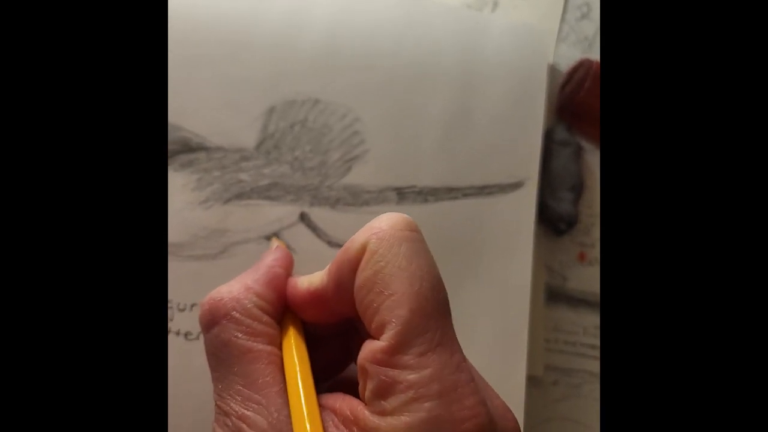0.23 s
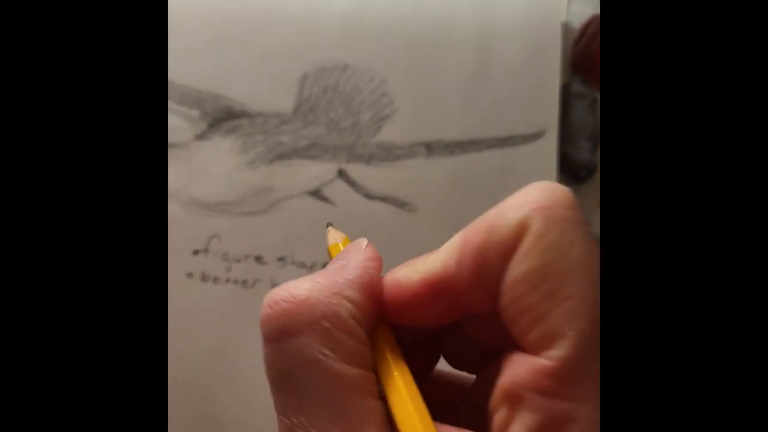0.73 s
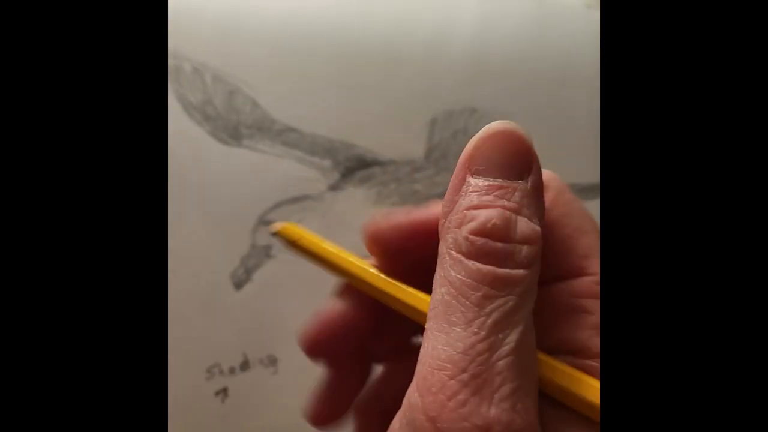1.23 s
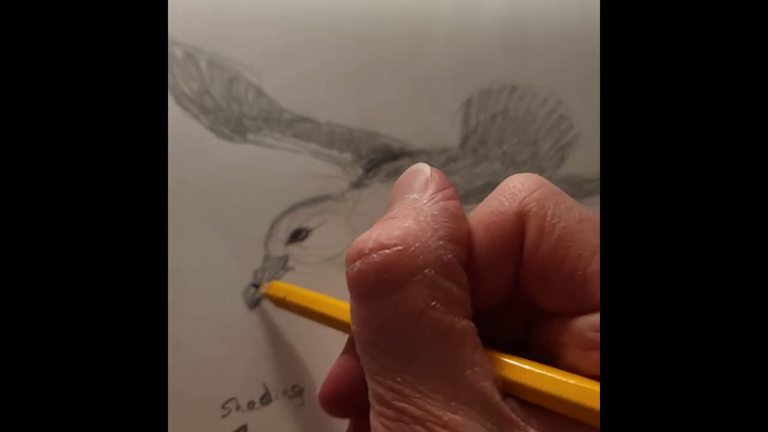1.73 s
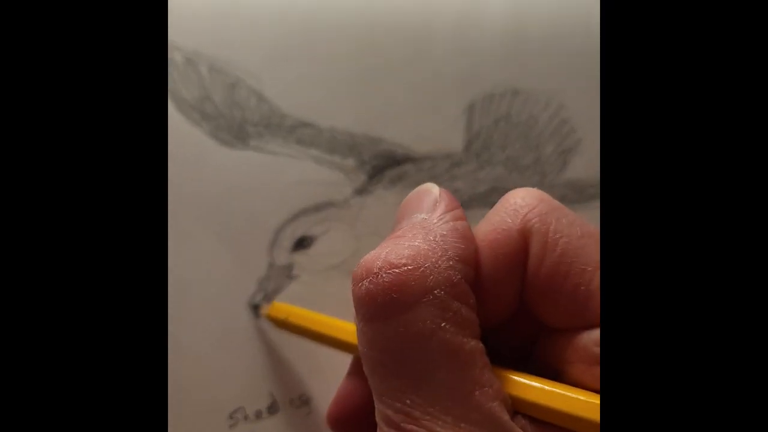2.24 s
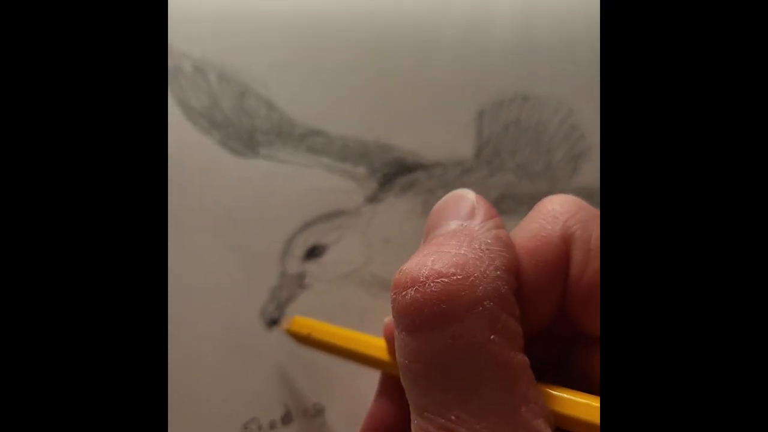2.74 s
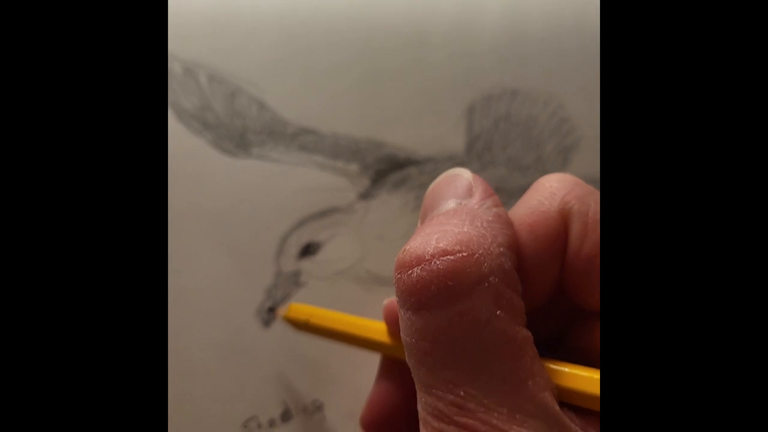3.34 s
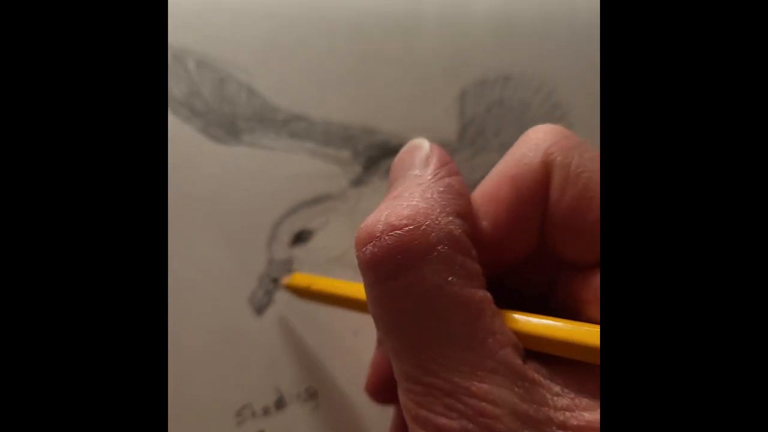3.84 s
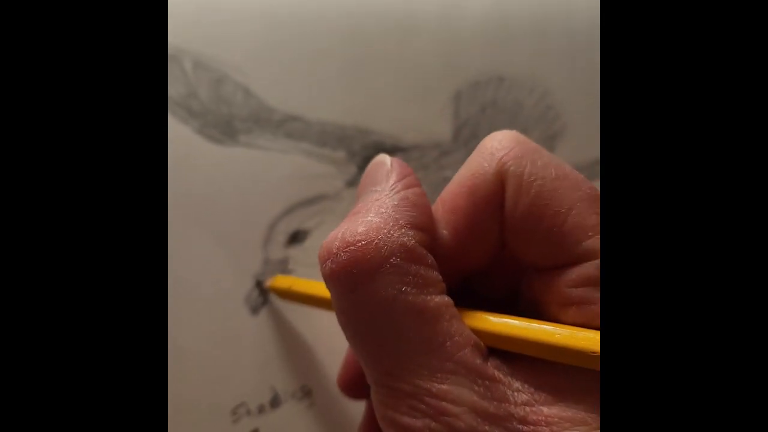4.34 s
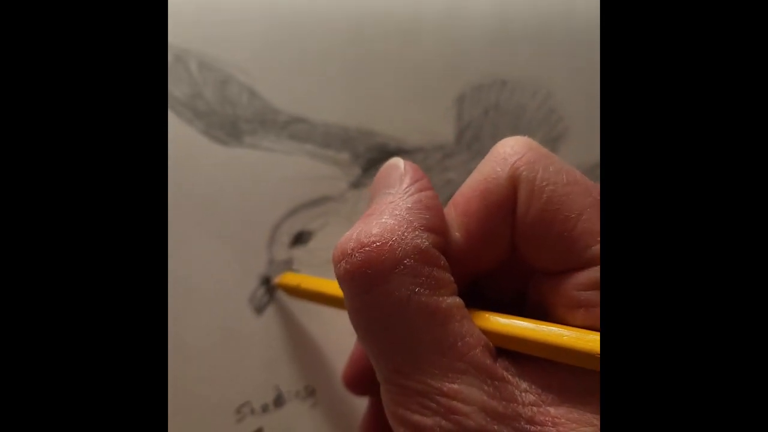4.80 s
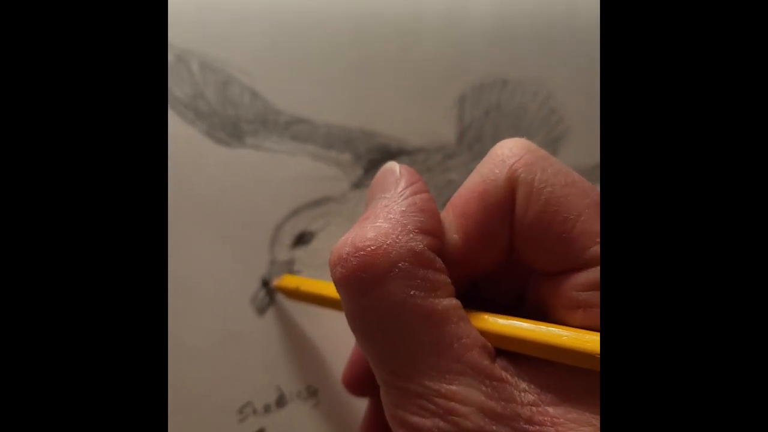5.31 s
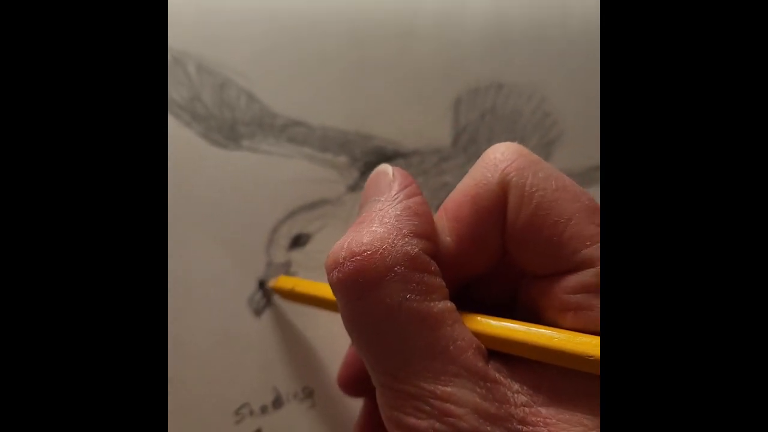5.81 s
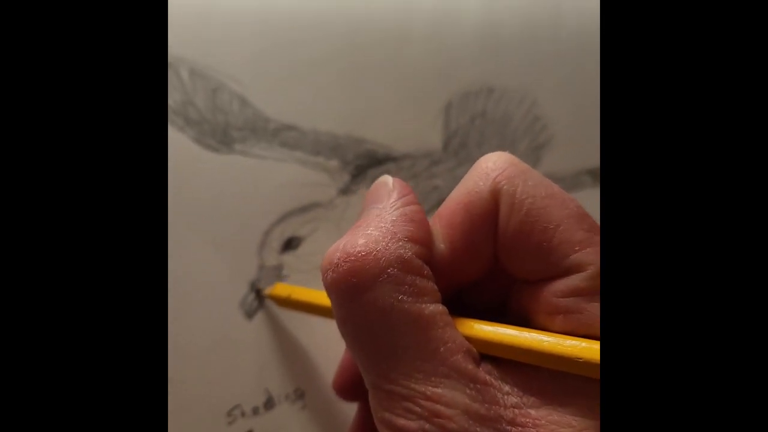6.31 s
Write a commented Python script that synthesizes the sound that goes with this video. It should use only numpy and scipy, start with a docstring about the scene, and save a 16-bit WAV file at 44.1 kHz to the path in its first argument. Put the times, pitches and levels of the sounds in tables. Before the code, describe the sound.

A quiet room heard through a close stereo microphone: steady low mains hum around 120 Hz, wavering motor tones, soft dark air noise and a faint thin whine near 860 Hz, clearer until about 1.4 s and again from 4.9 to 6 s. From 0 to 0.6 s, short bright pencil strokes fizz on paper, ending with a dry tick. From 0.6 to 1.6 s the hand slides over the page, papery and towards the right, with a dull forearm rub; a soft damped knock falls at 1.3 s. Lighter brushes continue to about 2.2 s, with another tick. Then it is mostly hum, a deep drone climbing slightly and swelling, and a brief slide at 3.6 s. From 4.1 s small ticks and faint, quick to-and-fro shading return, with firmer, less fizzy scratches near 4.6 s, 5.4 s and, densest, 6 to 6.5 s.

```python
"""A graphite pencil shades a sketchbook page in short, light strokes, close to two microphone ports.
First come quick, fizzy strokes; then the hand slides over the page, the forearm rubs and the pad knocks softly.
After a quieter gap with one more slide, faint shading and firmer strokes return; the point ticks now and then.
Strokes and skin are random slips over paper fibres, shaped by speed curves; ticks and the knock are short decays.
Throughout, sines make mains hum, motor tones, a whine and a drone that climbs once; noise makes the room's air."""
import sys
import numpy as np
from scipy.fft import rfft, irfft, next_fast_len
from scipy.io import wavfile
from scipy.ndimage import map_coordinates

SR = 44100
rng = np.random.default_rng(int(sys.argv[2]) if len(sys.argv) > 2 else 0)


def log_audio(samples):
    """Write samples as a 16-bit WAV file to the path given in sys.argv[1]."""
    # one column per channel
    frames = np.atleast_2d(samples).T
    # limit to full scale, then quantise
    limited = np.clip(frames, -1, 1)
    pcm = np.round(limited * 32767).astype(np.int16)
    wavfile.write(sys.argv[1], SR, pcm)


N = 289296

# how alike left and right are for sounds on the page: f/Hz, likeness (1 = the same)
PAGE_LIKENESS = [(1500, 0.11), (4000, 0.23), (7000, .4), (11000, 0.97)]


def pencil():
    """Each stroke speeds up and slows down and rings the shaft; the lead's sharp edge adds a high fizz."""
    # pencil strokes: middle t/s, length/s, level/dB
    strokes = [(0.021, 0.049, -68), (.102, .046, -78), (.184, .042, -69.5), (.235, .045, -78),
               (.37, .06, -84), (.46, .04, -84), (.546, 0.049, -66.5), (4.34, .05, -76), (4.45, .045, -79),
               (4.533, .036, -68), (4.687, 0.055, -65), (5.33, .045, -71), (5.41, .056, -76),
               (5.88, 0.056, -76.5), (5.985, .053, -71.5), (6.195, .042, -71.5), (6.275, .08, -75),
               (6.363, .052, -66), (6.437, .042, -64), (6.52, .075, -75)]
    # colour of graphite on paper: f/Hz, relative level/dB
    graphite = [(1000, -18), (3500, -3), (4700, 3), (6500, 0), (8000, 0), (10200, -2), (11500, -3),
                (15500, -7)]
    # resonances of the shaft and lead: f/Hz, width/Hz, left gain/dB, right gain/dB
    shaft = [(4570, 350, 3.5, 9), (5630, 450, -5, -3), (6900, 300, 0, -6), (7600, 350, 7, -3.5),
             (9000, 500, -5, -7), (10200, 450, 2, 2), (15200, 500, 3, 12)]
    # colour of the sharp edge's fizz: f/Hz, relative level/dB
    edge_colour = [(1200, -18), (2400, 1), (3500, -7), (4600, -16), (6500, -4.5), (8500, -14), (9800, -2),
                   (11200, -15), (13400, 1), (15500, -12)]
    # how alike left and right are in the fizz: f/Hz, likeness (1 = the same)
    edge_likeness = [(3000, .1), (12000, 0.66), (15000, .7)]
    # the pencil starts upright on its sharp edge, then is laid flatter; fizz levels are relative to the stroke
    regrip_s, upright_fizz_db, flat_fizz_db = 1.2, 5, -11

    speed = sum(amp(db) * sweep(middle, length) for middle, length, db in strokes)
    speed = speed + light_shading()
    fizz = speed * amp(np.where(seconds() < regrip_s, upright_fizz_db, flat_fizz_db))
    pressure = amp(1.4 * wobble(110))

    body = stereo(tooth(rate=22000, spread_db=1.5), graphite, PAGE_LIKENESS)
    body = filtered(body, lambda hz: bells(shaft, hz))
    body = off_the_hand(body, share=0.4, delay=0.0006, sway=0.25)

    edge = stereo(tooth(rate=26000, spread_db=3.0), edge_colour, edge_likeness)
    edge = off_the_hand(edge, share=0.38, delay=0.00038, sway=0.18)
    return pressure * (speed * body * pan(-0.3) + fizz * edge)


def light_shading():
    """The speed of the faint, loosely regular to-and-fro of the point."""
    start_s, strokes_per_s, flick_s = 4.1, 6.5, 0.048
    level_db, scatter_db = -85, 3
    beats = np.arange(start_s, N / SR, 1 / strokes_per_s)
    chance = rng.standard_normal((len(beats), 2))
    speed = np.zeros(N)
    for beat, (late, force) in zip(beats, chance):
        middle = beat + 0.2 * late / strokes_per_s
        speed += amp(level_db + scatter_db * force) * sweep(middle, flick_s)
    return speed


def ticks():
    """The point lands with a dry click that the pad damps at once, by 60 dB in 13 ms."""
    # the point touches the page: t/s, level/dB
    touches = [(0.625, -58), (.903, -66), (2.202, -61), (4.190, -65), (4.239, -67), (4.302, -60),
               (4.919, -69), (5.599, -64)]
    # colour of the click: f/Hz, relative level/dB
    click = [(1500, -15), (4000, -6), (5200, 5), (6500, -1), (8000, -4), (15500, -12)]
    blows = np.zeros(N)
    for start, db in touches:
        age = seconds() - start
        blows += (age >= 0) * amp(db - 60 * np.abs(age) / 0.013)
    return blows * stereo(rng.standard_normal((2, N)), click, PAGE_LIKENESS)


def hand():
    """Skin brushes the page on the right, the heel of the hand drags, and the forearm rubs dully on the desk."""
    # the hand slides to a new place on the page: middle t/s, length/s, level/dB
    slides = [(.76, 0.3, -72.5), (1.06, 0.12, -69), (1.31, 0.2, -71), (1.53, .08, -77), (1.837, .1, -79),
              (2.09, 0.35, -75), (3.61, .15, -76)]
    # colour of skin on paper: f/Hz, relative level/dB
    skin_colour = [(800, -21), (2300, 1.5), (3500, 3), (5600, -2.5), (6400, -2.5), (8500, -6),
                   (11200, -9.5), (11900, -13), (15500, -7.5)]
    # colour of the dragging heel: f/Hz, relative level/dB
    heel_colour = [(1200, -19), (2400, 1), (3500, 2.5), (5200, -5), (7000, -13), (12000, -23)]
    # colour of the forearm's rub: f/Hz, relative level/dB
    sleeve_colour = [(300, -15), (900, -13), (1300, 23), (1700, -18), (4000, -20), (10000, -53)]
    resting_skin_db = -85  # the resting hand never lies quite still
    # the extra drag of the heel fades out around the settling time
    heel_db, settle_s, settling_s, resting_heel_db = -77.5, 2.7, 0.14, -82
    heel_in_slide_db = -15  # each slide presses the heel too, relative to the skin
    arm_s, arm_length_s, arm_db = 0.8, 1.0, -63.5  # one shift of the forearm

    skin = stereo(tooth(rate=12000, spread_db=1.5), skin_colour, PAGE_LIKENESS)
    skin = off_the_hand(skin, share=0.22, delay=0.000885, sway=0.091)
    heel = stereo(rng.standard_normal((2, N)), heel_colour, PAGE_LIKENESS)
    sleeve = stereo(rng.standard_normal((2, N)), sleeve_colour, PAGE_LIKENESS)

    slide = sum(amp(db) * sweep(middle, length) for middle, length, db in slides)
    drag = amp(resting_heel_db) + amp(heel_db) * (1 - after(settle_s, settling_s))
    drag = drag + amp(heel_in_slide_db) * slide
    shift = amp(arm_db + 1.7 * wobble(8.6)) * sweep(arm_s, arm_length_s)

    brushing = (slide + amp(resting_skin_db)) * amp(0.93 * wobble(34.97)) * skin * pan(-5.5)
    dragging = drag * amp(wobble(12)) * heel * pan(0.69)
    rubbing = shift * sleeve * pan(3.7)
    return brushing + dragging + rubbing


def off_the_hand(x, share, delay, sway):
    """A reflection from the moving hand, about delay seconds late, cuts shifting notches, different at each port."""
    now = seconds()
    echo = []
    for side in x:
        lag = delay * np.exp(sway * wobble(3))
        echo.append(map_coordinates(side, [(now - lag) * SR]))
    return unit(x + share * np.array(echo))


def bump():
    """A fingertip drops on the pad as the grip changes: a soft, quickly damped knock."""
    start_s, level_db, pitch_hz = 1.2775, -40, 520
    ring_s = 0.018  # time to die away by 60 dB
    age = np.maximum(seconds() - start_s, 0)
    return amp(level_db - 60 * age / ring_s) * np.sin(2 * np.pi * pitch_hz * age) * pan(-1)


def appliance():
    """Steady mains hum, wavering motor tones and a narrow, airy whine that comes and goes."""
    # mains hum: multiple of the mains frequency, left level/dB, right level/dB
    hum_tones = [ (2, -38.5, -45), (4, -50.5, -51), (6, -59, -61), (8, -62.5, -68), (10, -79.5, -69)]
    # tones of the appliance motor and its casing: f/Hz, level/dB
    motor_tones = [(58.2, -68), (130.2, -53.5), (162.2, -60.5), (196.2, -62), (210.8, -67.5), (250, -57),
                   (268.9, -59), (390.2, -67.5), (395.3, -67)]
    # spells in which the whine stands out: start t/s, end t/s, level/dB added to the faint whine
    whine_spells = [(-.5, 1.4, -67), (4.9, 6, -67)]
    mains_hz, whine_hz = 60.03, 860
    faint_whine_db, whine_fade_s = -71.5, 0.11

    hum = sum(amp([[left], [right]]) * tone(multiple * mains_hz, drift=0.039, rate=4.0)
              for multiple, left, right in hum_tones)
    motor = sum(amp(db + 1.2 * wobble(1.65)) * tone(hz, drift=0.39, rate=1.5)
                for hz, db in motor_tones)

    airy = filtered(rng.standard_normal((2, N)), lambda hz: 1 / (1 + ((hz - whine_hz) / 12) ** 2))
    whine = unit(tone(whine_hz, drift=0.9, rate=9) + 0.45 * unit(airy))
    spells = sum(amp(db) * (after(start, whine_fade_s) - after(end, whine_fade_s))
                 for start, end, db in whine_spells)
    loudness = (amp(faint_whine_db) + spells) * amp(2.1 * wobble(6))
    return hum + motor * pan(1.5) + loudness * whine * pan(3.4)


def room():
    """Air noise coloured by the room, and a deep drone that swells and dips and climbs once in pitch."""
    # moving air in the room: f/Hz, relative level/dB
    air_colour = [(22, -32), (42, -13), (70, -4), (115, -1), (210, -4), (420, -8.5), (540, -17), (900, -17),
                  (1600, -23), (2500, -28), (2850, -33.5), (4200, -39), (9500, -55), (15500, -53.5)]
    # how alike left and right are in the air noise: f/Hz, likeness (1 = the same, 0 = unrelated)
    air_likeness = [(25, .85), (70, 0.99), (300, 0.92), (640, 0.3), (1400, -0.17), (3100, -0.0041),
                    (7000, -0.026), (11000, 1), (15000, 0.87)]
    # room resonances: f/Hz, width/Hz, left gain/dB, right gain/dB
    resonances = [(142, 6.6, -4.5, -3), (224, 3.1, 0, -9), (254.2, 13.4, 6, 6.5), (281, 11, -8, -1.5),
                  (333, 9, 1, 2), (377, 22, 2.5, 5), (460.4, 16, -5, 7.5), (626, 18, 4.5, 4),
                  (964, 8.1, -8.5, 5.5), (1060, 200, -1, -3), (3470, 530, 2.5, 0)]
    # the deep drone before a lift of 2 dB: t/s, level/dB
    drone_levels = [(2.25, -57), (3.14, -47), (3.56, -64), (3.94, -45), (4.18, -45), (4.37, -63),
                    (4.81, -48), (6.2, -53), (6.31, -68), (6.44, -48), (6.56, -64)]
    draught_db, draught_db_per_s = -1.5, 0.34  # the draught slowly gains low-mid body
    low_hz, high_hz, climb_from_s, climb_hz_per_s = 74.5, 86.4, 1.7, 5

    air = amp(-46.0) * stereo(rng.standard_normal((2, N)), air_colour, air_likeness)
    air = filtered(air, lambda hz: bells(resonances, hz) * standing_waves(hz, depth_db=3.0, spacing_hz=25.08))
    body = filtered(air, lambda hz: np.exp(-((hz - 400) / 130) ** 2))
    air = air + (amp(draught_db + draught_db_per_s * seconds()) - 1) * body

    pitch = np.clip(low_hz + climb_hz_per_s * (seconds() - climb_from_s), low_hz, high_hz)
    phase = 2 * np.pi * np.cumsum(pitch) / SR + 0.11 * wobble(6)
    drone = amp(curve(drone_levels) + 2.0) * np.sin(phase)
    return air + drone * pan(1.6)


def standing_waves(hz, depth_db, spacing_hz):
    """Crowded room modes ripple the midrange, differently at each port."""
    knots = int(hz[-1] / spacing_hz) + 4
    ripple = [map_coordinates(rng.standard_normal(knots), [hz / spacing_hz]) for port in 'LR']
    reach = np.interp(hz, [500, 1000, 2000, 3000], [0, 1, 1, 0])
    return amp(depth_db * np.array(ripple) * reach)


def tooth(rate, spread_db):
    """Tiny slips over the paper's fibres: random impacts of uneven size, rate a second."""
    slips = rng.poisson(rate / SR, N)
    sizes = np.sqrt(slips) * amp(spread_db * rng.standard_normal(N))
    return sizes * rng.standard_normal((2, N))


def sweep(middle, length):
    """The speed of one movement: it gathers, peaks at 1 and dies away."""
    return 1 / (1 + ((seconds() - middle) / (0.66 * length)) ** 2) ** 2


def after(start, fade):
    """A soft step from 0 to 1 around start; a larger fade (in seconds) makes it slower."""
    return 0.5 + 0.5 * np.tanh((seconds() - start) / (2 * fade))


def tone(hz, drift, rate):
    """A sine of rms 1 whose phase wanders by about drift radians, rate knots a second."""
    return np.sqrt(2) * np.sin(2 * np.pi * (hz * seconds() + rng.random()) + drift * wobble(rate))


def stereo(pair, spectrum, alike):
    """Two unrelated signals become a coloured, partly alike left and right of rms 1."""
    def response(hz):
        # this angle sets how much the two sides share
        turn = np.arccos(np.clip(along(alike, hz), -1, 1)) / 2
        return amp(along(spectrum, hz)) * [np.cos(turn), np.sin(turn)]
    mid, side = filtered(pair, response)
    return unit(np.array([mid + side, mid - side]))


def bells(rows, hz):
    """Left and right gain of a set of bell-shaped peaks and dips."""
    gain_db = 0
    for centre, width, left, right in rows:
        gain_db = gain_db + np.outer([left, right], np.exp(-((hz - centre) / width) ** 2))
    return amp(gain_db)


def filtered(x, response):
    """Scale each frequency of x by the response."""
    size = next_fast_len(N + 8192)
    hz = np.fft.rfftfreq(size, 1 / SR)
    return irfft(rfft(x, size) * response(hz), size)[..., :N]


def wobble(rate):
    """A smooth random curve, rate knots a second."""
    knots = rng.standard_normal(int(N * rate / SR) + 4)
    return map_coordinates(knots, [seconds() * rate])


def along(points, hz):
    """Read (frequency, value) points on a log frequency axis."""
    f, v = np.transpose(points)
    return np.interp(np.log(hz + 1), np.log(f + 1), v)


def curve(rows):
    """Turn (time, value) rows into one value per sample."""
    return np.interp(seconds(), *np.transpose(rows))


def pan(db):
    """Left and right gains for a left-minus-right level in dB."""
    return amp([[db / 2], [-db / 2]])


def amp(db):
    """Turn decibels into an amplitude factor."""
    return 10 ** (np.asarray(db) / 20)


def unit(x):
    """Scale x to an rms of 1."""
    return x / np.sqrt(np.mean(x ** 2) + 1e-20)


def seconds():
    """The time of every sample in seconds."""
    return np.arange(N) / SR


def scene():
    """Pencil and hand close by, the humming room behind them."""
    return pencil() + ticks() + hand() + bump() + appliance() + room()


def record(dry):
    """Each port colours the treble in its own way; nothing is kept above the band limit."""
    # resonances of the two microphone ports: f/Hz, width/Hz, left gain/dB, right gain/dB
    ports = [(3110, 890, -0.5, -6.5), (4450, 250, 0, -5), (5090, 350, 3, 2), (5850, 220, 0.5, -6),
             (7490, 1270, 0.5, 9), (8570, 300, -10, -1.5)]
    top_hz = 15750
    return filtered(dry, lambda hz: bells(ports, hz) * (hz < top_hz))


dry = scene()
out = record(dry)
log_audio(out)
```